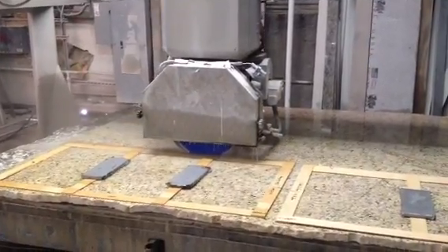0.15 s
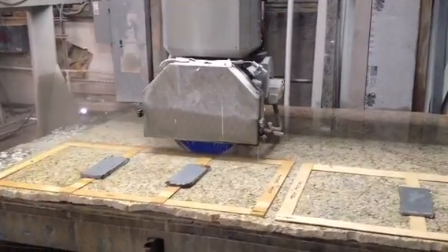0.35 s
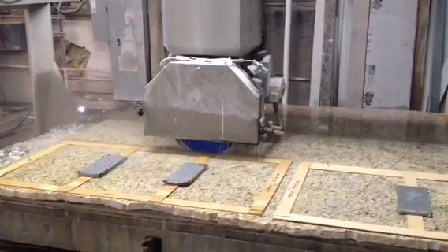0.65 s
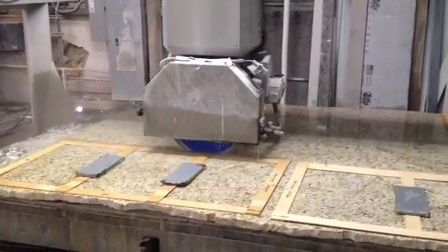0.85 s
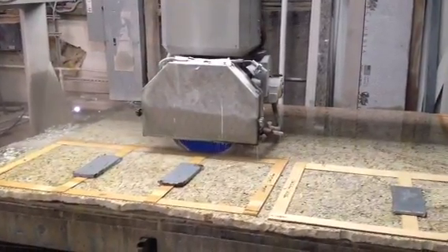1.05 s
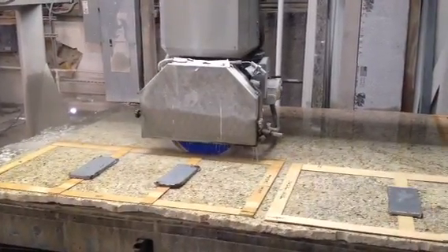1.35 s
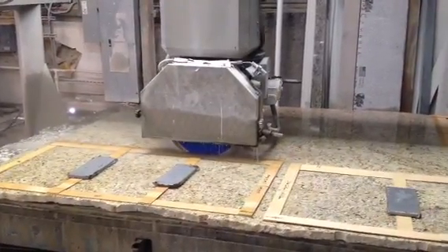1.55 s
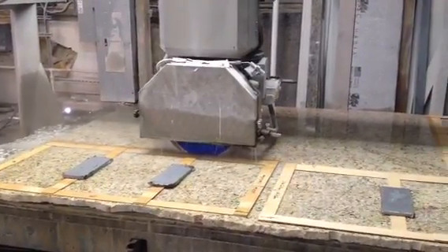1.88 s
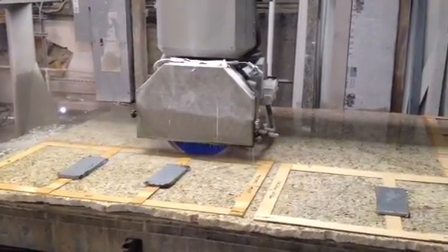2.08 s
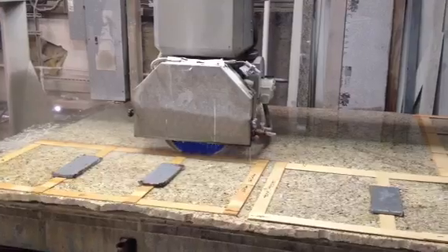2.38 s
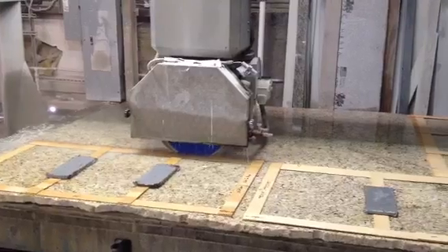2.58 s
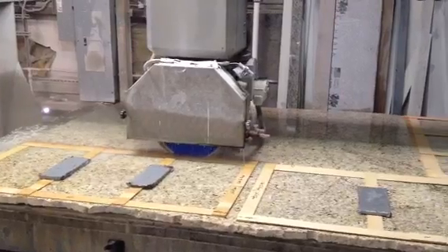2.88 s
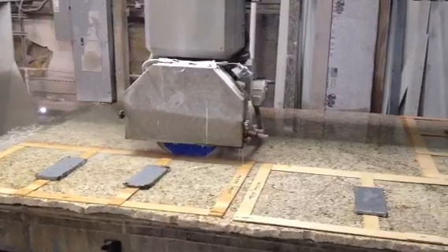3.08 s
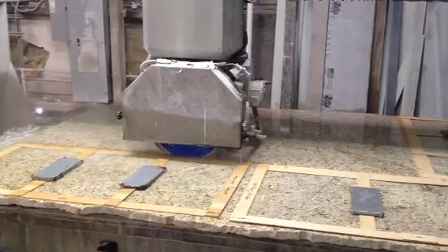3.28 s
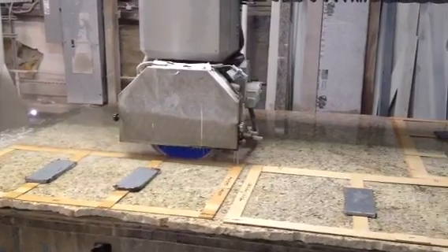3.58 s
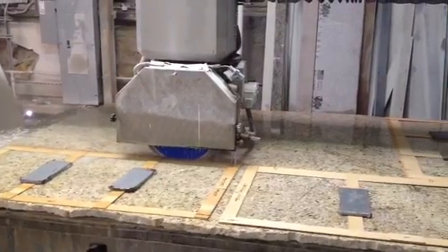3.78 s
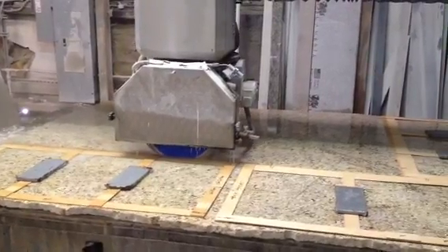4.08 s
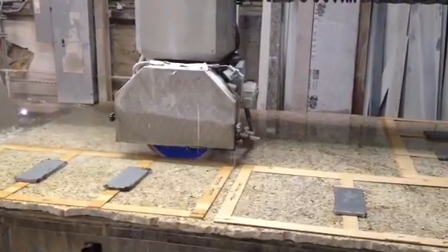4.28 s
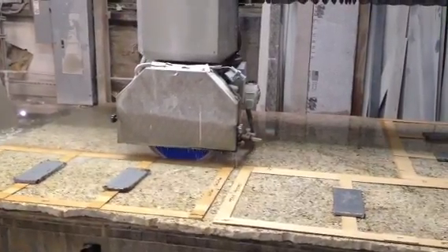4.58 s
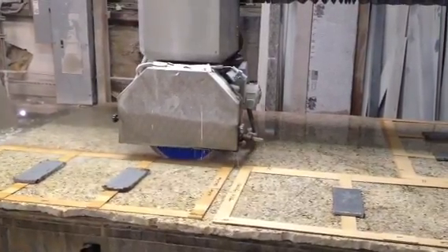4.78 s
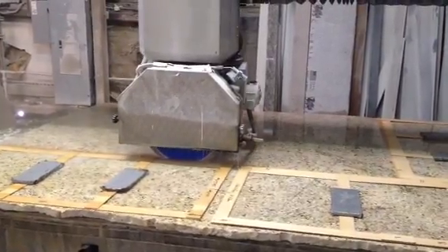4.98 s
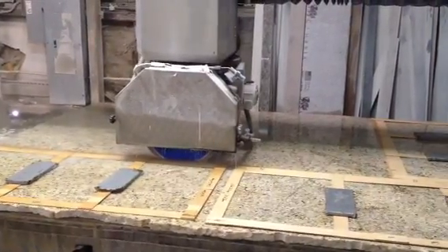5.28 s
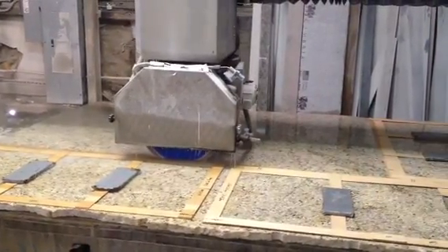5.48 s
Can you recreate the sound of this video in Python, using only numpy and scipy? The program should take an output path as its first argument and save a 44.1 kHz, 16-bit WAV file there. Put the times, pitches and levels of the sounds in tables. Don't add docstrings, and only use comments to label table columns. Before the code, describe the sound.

Constant bright rushing hiss of a water-cooled stone saw, with buzzing whine, faint whistles and low motor drone, heard from close by.

```python
import sys
import numpy as np
from scipy import signal
from scipy.fft import rfft, irfft
from scipy.io import wavfile
from scipy.ndimage import map_coordinates

SR = 44100
rng = np.random.default_rng(int(sys.argv[2]) if len(sys.argv) > 2 else 0)


def makeup_ratio(level_db):
    decades = np.asarray(level_db, float) / 20
    return 10 ** decades


def unload_wav(signal):
    wavfile.write(
        sys.argv[1],
        SR,
        np.round(np.clip(np.atleast_2d(signal).T, -1, 1) * 32767).astype(np.int16),
    )


N = 249164
T = np.arange(N) / SR
SHAFT_HZ = 29.8939


def walk(rate, shape):
    knots = rng.standard_normal((*shape[:-1], 400))
    at = np.linspace(0, N / SR, shape[-1]) * np.clip(rate, 0, 60)
    i = at.astype(int)
    ease = .5 - .5 * np.cos(np.pi * (at - i))
    blend = knots[..., i] * (1 - ease) + knots[..., i + 1] * ease
    return blend / np.sqrt(.75)


def contour(table, hz):
    f, db = np.transpose(table)
    return np.interp(np.log(hz + 1), np.log(f), db)


def band(spectrum, lo_hz, hi_hz):
    f = np.arange(len(spectrum)) * SR / N
    return irfft(spectrum * (f >= lo_hz) * (f < hi_hz), N)


def arch(s, length):
    return np.cos(np.pi * np.clip((T - s) / length, -.5, .5))


def load():
    # time in seconds, hiss level in dB.
    cut_points = [(0.0, -17.5), (0.05, -16), (0.53, -15.5), (0.61, -17), (1.29, -16), (2.36, -16.5),
                  (2.5, -15.4), (3.57, -17), (4.63, -15), (4.89, -16), (5.65, -17.5)]
    s, db = np.transpose(cut_points)
    hiss = np.interp(T, s, db)
    spray = .5 * hiss - .25 * T
    grind = .7 * hiss
    return [c - c.mean() for c in (hiss, spray, grind)]


def shaft_orders(scatter_db=3.6, swell_db=2.5, wear=.0105, wear_top=1.6, quick=.26, lift_db=.9):
    # shaft order, top rms in dB, loudest at in seconds, fall in dB fade_s away.
    motor_orders = [(3, -65.5, 4.5, 3.2), (4, -65.5, 3.6, 0.5), (5, -53.0, 5.1, 2.3), (6, -58.0, -1.0, 1.2),
                    (7, -57.5, -1.0, 0.5), (8, -37.0, 4.8, 1.4), (9, -46.0, 1.2, 1.2), (10, -61.0, -1.0, 0),
                    (11, -45.0, 5.6, 0.9), (12, -52.5, 7.0, 1.5), (13, -47.0, 3.3, 2.1),
                    (14, -53.0, 4.9, 4.3), (15, -50.0, 4.7, 1.3), (16, -55.0, 2.8, 2.3)]
    # shaft order, top rms in dB, loudest at in seconds, fall in dB fade_s away.
    housing_orders = [(17, -53, 4.6, 2.5), (18, -56.5, .8, .3), (19, -50, 2.9, .8), (20, -53, 2.6, 3.1),
                      (21, -56, -1, .4), (23, -48.5, .1, 1.7), (24, -43, 6.4, .7), (25, -47.5, 7, .2),
                      (26, -50.5, .9, 2.2), (27, -52, 3.3, 1.2), (28, -38.5, 3.5, 3.2), (29, -51.5, 4.7, 1),
                      (30, -52, 7, .8), (31, -50.5, 7, .2)]
    # shaft order, top rms in dB, loudest at in seconds, fall in dB fade_s
    resonance_orders = [(56, -46.5, 1.9, 5.0), (62, -49.0, 3.2, 2.7), (67, -43.5, 3.2, 3.4),
                        (71, -46.0, 4.6, 1.8), (72, -45.0, 0.1, 1.0), (75, -44.0, 7.0, 0.6),
                        (77, -56.0, 7.0, 0.6), (80, -43.0, 2.4, 4.9), (81, -43.0, 3.5, 2.5),
                        (82, -46.5, 6.2, 0.3), (83, -46.0, 7.0, 0.1), (87, -48.0, -1.0, 1.2),
                        (89, -51.0, -1.0, 0.0), (91, -50.5, 6.0, 0.8)]
    # shaft order, top rms in dB, loudest at in seconds,
    # fall in dB fade_s away.
    more_resonance_orders = [(32, -56.0, 2.7, 2.0), (33, -49.5, 2.4, 4.2), (34, -53.5, 3.4, 1.5),
                             (42, -52.0, -1.0, 0.7), (53, -51.5, 3.1, 2.1), (109, -56.0, 3.3, 1.3),
                             (124, -53.5, 0.3, 2.3), (125, -53.5, 1.1, 1.5), (130, -51.0, 2.9, 6.7),
                             (132, -50.0, 2.3, 1.4), (150, -47.0, 7.0, 0.2), (199, -40.5, -1.0, 0.2),
                             (206, -36.0, 2.5, 3.3), (225, -36.0, 2.6, 1.4)]
    # frequency in Hz, rms in dB per order.
    rim_curve = [(1016, -58), (1166, -65), (1315, -61.5), (1644, -55.5), (2093, -52.5), (2541, -55.5),
                 (3139, -59), (3737, -60), (4484, -53.5), (5381, -47), (6577, -42), (7772, -46),
                 (9865, -54.5), (12555, -59)]
    fade_s = 2

    turns = int(N / SR * SHAFT_HZ) + 2
    k = np.arange(500)
    s = np.arange(turns) / SHAFT_HZ
    turn_start = np.minimum((s * SR).astype(int), N - 1)
    hiss, spray, grind = (c[turn_start] for c in load())

    scatter = scatter_db * rng.standard_normal(len(k)) + swell_db * walk(.5, (len(k), turns)).T
    mean_power_db = .115 * (scatter_db ** 2 + swell_db ** 2)
    db = contour(rim_curve, k * SHAFT_HZ) + scatter - mean_power_db
    db[:, :17] = -200
    for order, top_db, best_s, fall_db in [*motor_orders, *housing_orders, *resonance_orders, *more_resonance_orders]:
        db[:, int(order)] = top_db - fall_db * ((s - best_s) / fade_s) ** 2 + lift_db
    reach = np.clip(k / 60, 0, 1)
    db = db + reach * np.where(k * SHAFT_HZ > 4500, hiss[:, None], grind[:, None])

    loose = np.minimum(wear * k, wear_top)[:, None]
    slow = walk(1.2, (len(k), turns))
    fast = walk(5, (2, len(k), turns))
    phasor = np.exp(1j * (2 * np.pi * rng.random((len(k), 1)) + loose * slow))
    phasor = phasor * (1 + quick * loose * (fast[0] + 1j * fast[1]))
    phasor = phasor / np.sqrt(1 + 2 * (quick * loose) ** 2)

    size = 8192
    waves = irfft(makeup_ratio(db) * phasor.T, size) * size / np.sqrt(2)
    waves = np.c_[waves, waves[:, 0]]
    place = T * SHAFT_HZ
    return map_coordinates(waves, [place, place % 1 * size], order=1)


def grit_and_spray(shared_db=0.51, own_db=0.47, throb=.05):
    # frequency in Hz, density in dB per Hz.
    rumble_curve = [(40, -108), (80, -95), (150, -76.5), (230, -83.5), (390, -83.5), (640, -76), (850, -79),
                    (980, -75.5), (1150, -78.5), (1280, -72), (1510, -75), (2100, -69), (2460, -69),
                    (2860, -74)]
    # frequency in Hz, density in dB per Hz.
    hiss_curve = [(2860, -73), (3400, -77.5), (3900, -71), (4600, -63), (5300, -57), (6000, -54),
                  (6850, -47.5), (7800, -56), (8700, -55.5), (9500, -61), (11000, -64.5), (12200, -63.5),
                  (14000, -67.5), (15200, -71.5)]
    f = np.arange(N // 2 + 1) * SR / N
    colour = makeup_ratio(contour([*rumble_curve[:-1], *hiss_curve], f)) * np.sqrt(SR / 2)
    spectrum = rfft(rng.standard_normal(N)) * colour
    hiss, spray, grind = load()
    shared = shared_db * walk(24, (N,))
    out = band(spectrum, 0, 1000)
    for lo in 1000 * 2 ** np.arange(0, 4, .5):
        follow = grind if lo < 3900 else hiss if lo < 7900 else spray
        own = own_db * walk(14, (N,))
        out = out + band(spectrum, lo, lo * 2 ** .5) * makeup_ratio(follow + shared + own)
    spin = 2 * np.pi * SHAFT_HZ * T
    return out * (1 + throb * np.cos(spin) + throb * np.cos(3 * spin + 1))


def tone(events, wobble_hz, flutter_db):
    wobble = wobble_hz * walk(12, (N,))
    flutter = makeup_ratio(flutter_db * walk(14, (N,)))
    out = np.zeros(N)
    for s, length, hz, rise_hz, db in events:
        pitch = hz + rise_hz * np.clip((T - s) / length, -.5, .5) + wobble
        phase = 2 * np.pi * np.cumsum(pitch) / SR
        out += makeup_ratio(db) * arch(s, length) ** 2 * np.sin(phase)
    return np.sqrt(2) * flutter * out


def slot_whistles():
    # centre in seconds, length in seconds, frequency in Hz, rise in Hz, rms in dB.
    whistle_events = [(.35, 1.3, 1270, 15, -53), (1.0, .5, 1290, 15, -51), (1.55, .7, 1290, -60, -52),
                      (2.4, .6, 1250, 20, -57), (3.4, .9, 1300, 10, -58), (4.22, .35, 1245, -50, -52),
                      (4.6, .35, 1235, 15, -50), (5.35, .8, 1350, 5, -54), (2.5, 1.3, 1900, 300, -50),
                      (3.75, .8, 1805, 20, -50), (3.2, .8, 972, -5, -53), (4.85, .8, 930, 20, -53)]
    return tone(whistle_events, wobble_hz=5, flutter_db=4)


def feed_moans():
    # centre in seconds, length in seconds, frequency in Hz, rise in Hz, rms in dB.
    moan_events = [
        (.6, .33, 211, 0, -45.5),
        (1.35, .4, 212, 1, -47),
        (1.78, .38, 211, -2, -48.5),
        (2.15, .5, 213, 0, -53),
    ]
    return tone(moan_events, wobble_hz=2, flutter_db=2.0)


def phone_touch():
    # centre in seconds, length in seconds, peak in dB.
    touch_event = (5.015, .03, -62)
    s, length, db = touch_event
    return makeup_ratio(db) * arch(s, length) ** 2


def coarse_treble(x, ease_db_per_s=.6, keep=.47):
    # frequency in Hz, rounding step in dB.
    step_curve = [(11000, -24), (12400, -17), (12800, -11.5), (14100, -16.5), (14800, -11.5),
                  (15100, -19.5), (15270, -22), (15310, 0)]
    size = 1024
    n = np.arange(2 * size)[:, None]
    k = np.arange(500, 800)
    window = np.sin(np.pi * (n + .5) / 2 / size)
    basis = np.sqrt(2 / size) * window * np.cos(np.pi / size * (n + .5 + size / 2) * (k + .5))
    at = np.arange(0, N - 2 * size, size)[:, None]
    lines = x[at + n.T] @ basis
    step = makeup_ratio(contour(step_curve, k * SR / 2 / size) - ease_db_per_s * at / SR)
    rounded = np.sign(lines) * step * np.floor(np.abs(lines) / step + keep)
    error = (rounded - lines) @ basis.T
    return x + np.bincount((at + n.T).ravel(), error.ravel(), N)


def side_bursts():
    # centre in seconds, length in seconds, low edge in Hz, high edge in Hz, level in dB.
    burst_events = [(.182, .046, 4200, 5800, -30), (2.968, .046, 8300, 9700, -29),
                    (3.153, .046, 13100, 14600, -37), (3.259, .069, 5600, 7000, -20),
                    (3.27, .046, 7000, 8300, -24), (3.27, .046, 9000, 10400, -32),
                    (3.874, .046, 12400, 14600, -34), (4.107, .046, 9000, 10400, -30),
                    (4.432, .046, 7600, 9100, -28), (4.432, .046, 11800, 13200, -34),
                    (5.64, .046, 11800, 13200, -34)]
    white = rfft(rng.standard_normal(N))
    side = np.zeros(N)
    for s, length, lo, hi, db in burst_events:
        unit_noise = band(white, lo, hi) * np.sqrt(SR / 2 / (hi - lo))
        side += makeup_ratio(db) * arch(s, length) * unit_noise
    return np.array([side, -side])


def scene():
    mono = shaft_orders() + grit_and_spray() + slot_whistles() + feed_moans() + phone_touch()
    return np.array([mono, mono])


def band_limit(x):
    return signal.sosfilt(signal.butter(12, 15740, fs=SR, output="sos"), x)


def record(dry):
    coarse = [coarse_treble(c) for c in dry]
    low_pass = signal.ellip(12, .3, 90, 15400, fs=SR, output="sos")
    x = signal.sosfilt(low_pass, coarse)
    return band_limit(x + side_bursts())


dry = scene()
out = record(dry)
unload_wav(out)
```